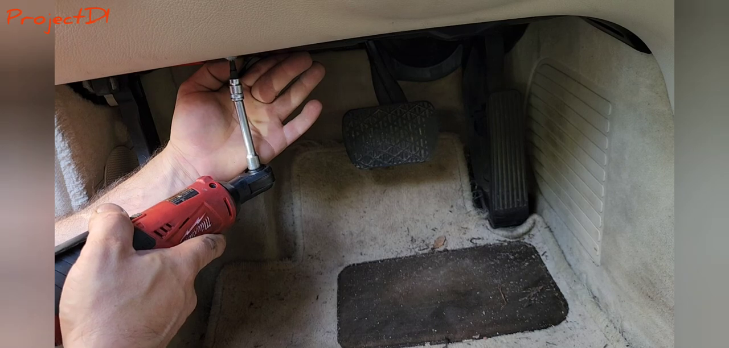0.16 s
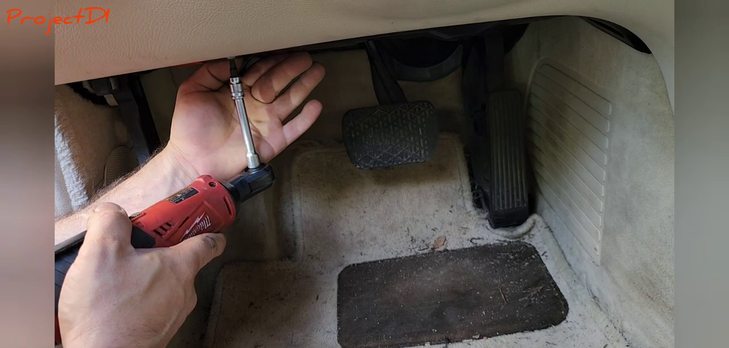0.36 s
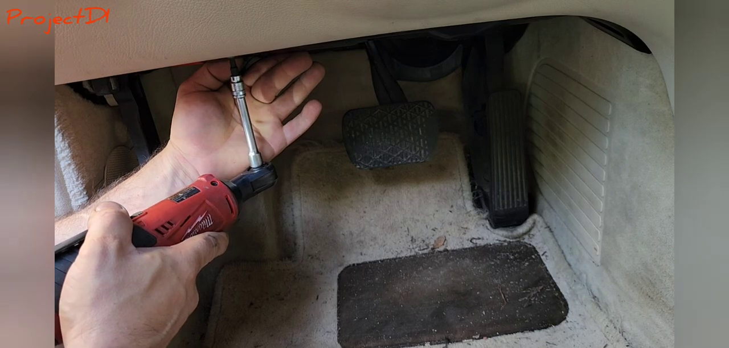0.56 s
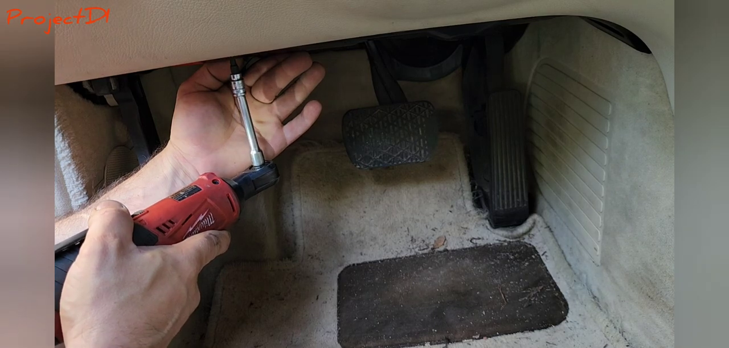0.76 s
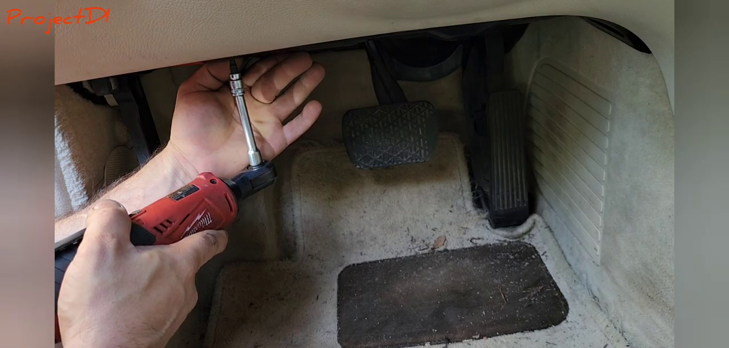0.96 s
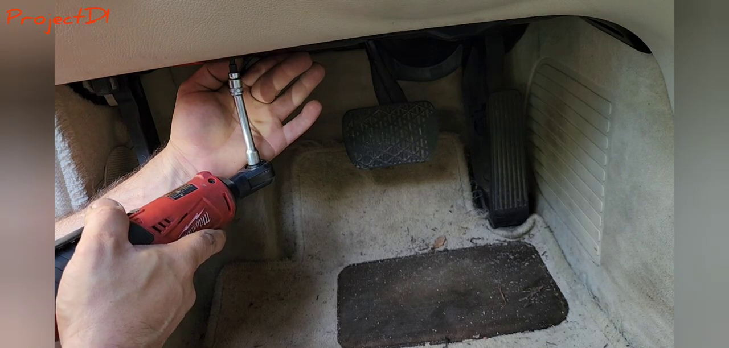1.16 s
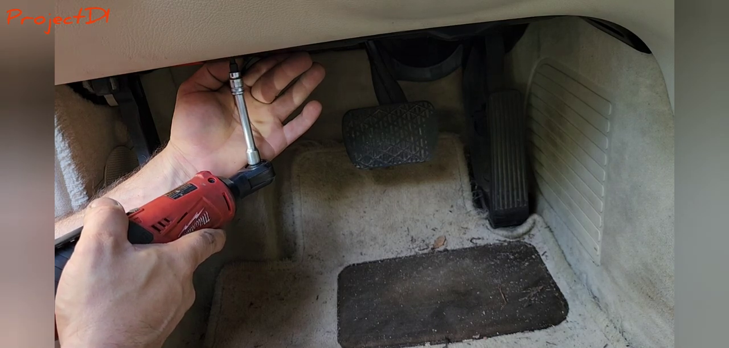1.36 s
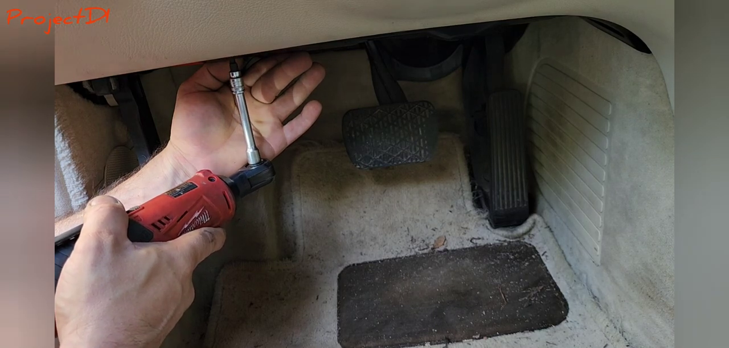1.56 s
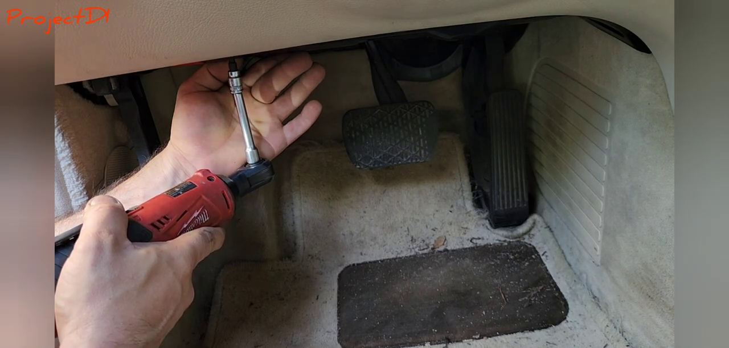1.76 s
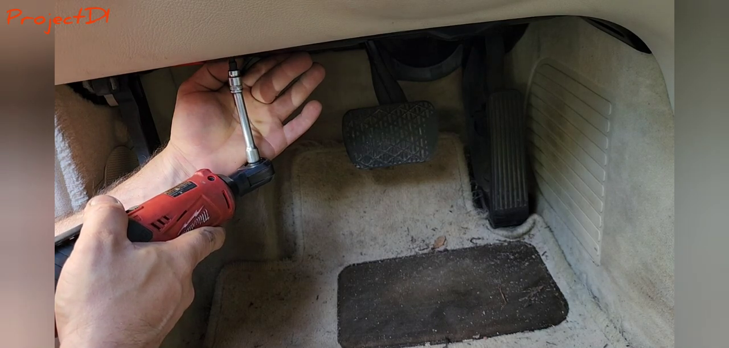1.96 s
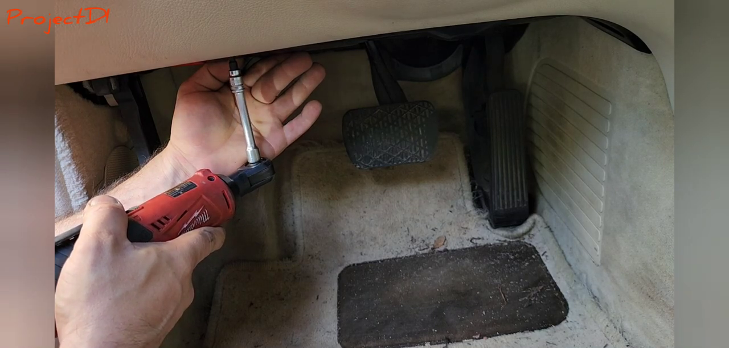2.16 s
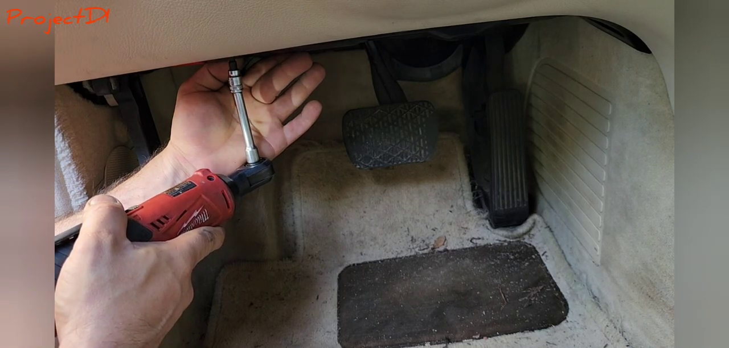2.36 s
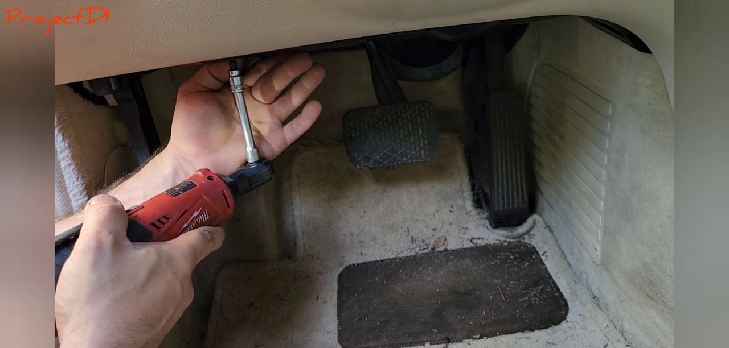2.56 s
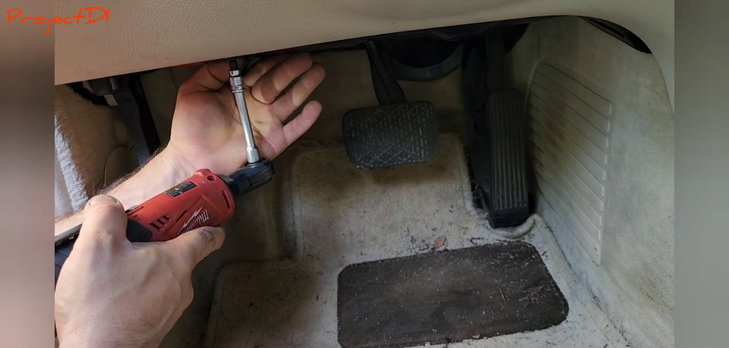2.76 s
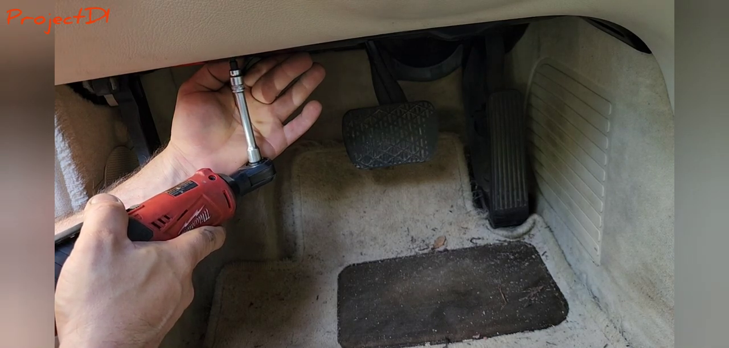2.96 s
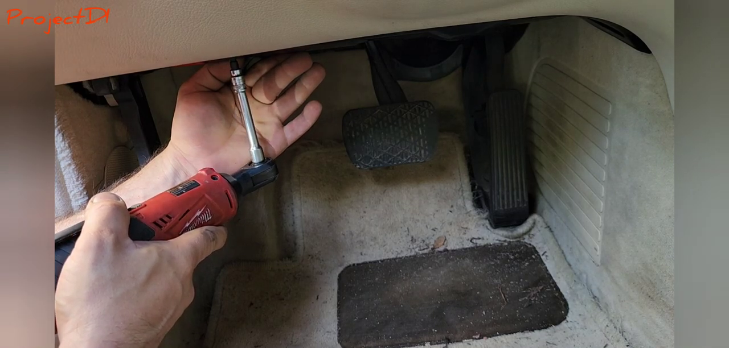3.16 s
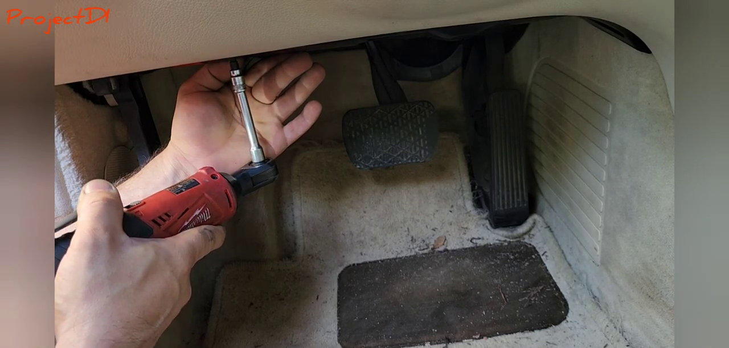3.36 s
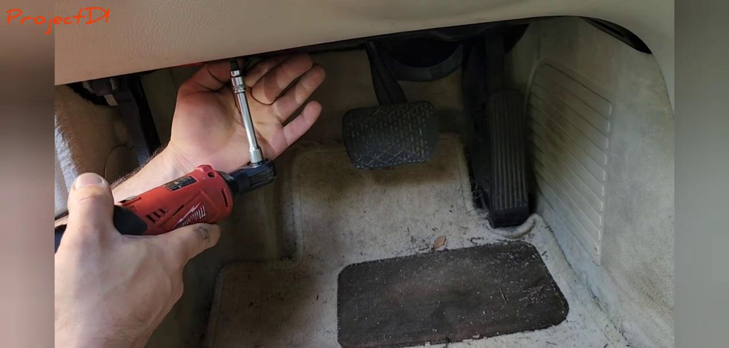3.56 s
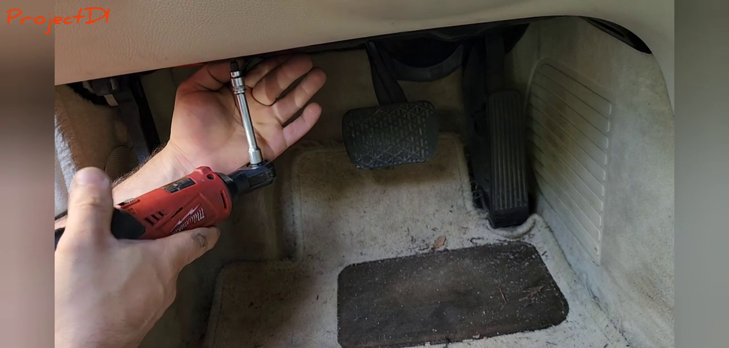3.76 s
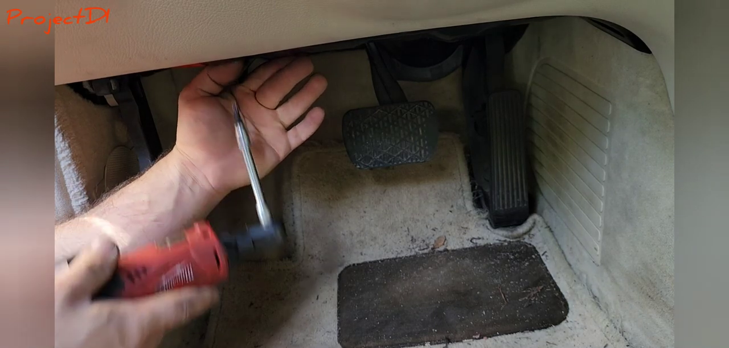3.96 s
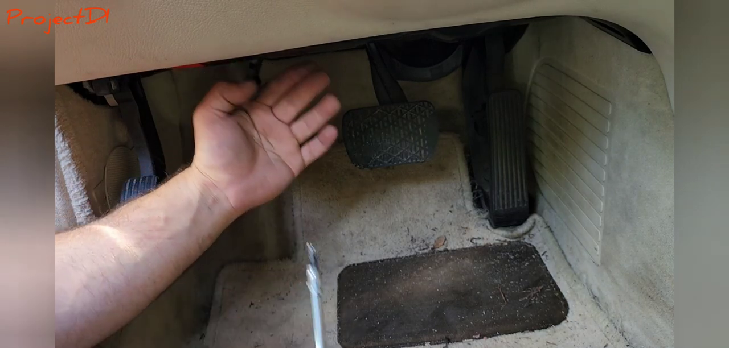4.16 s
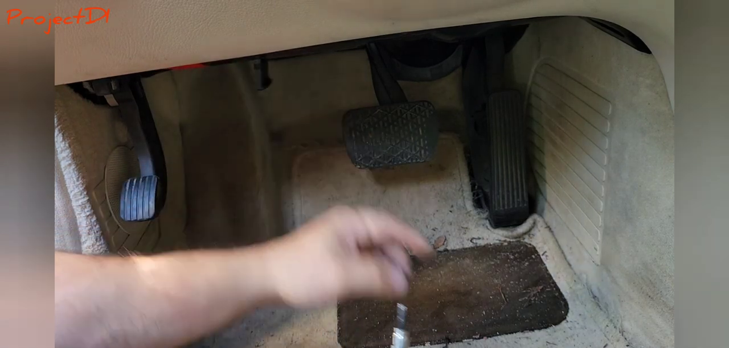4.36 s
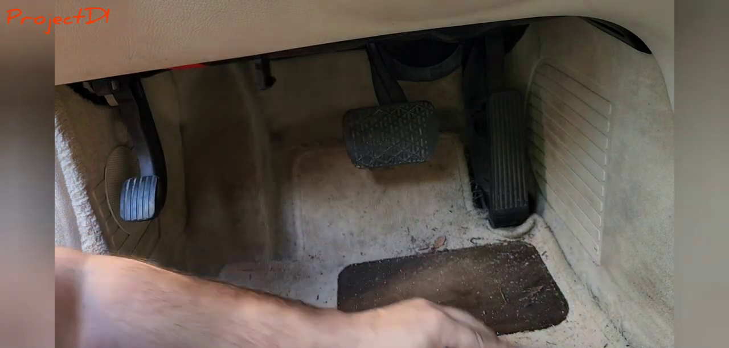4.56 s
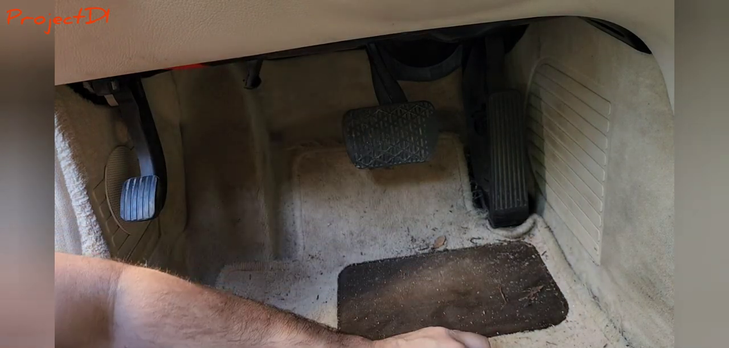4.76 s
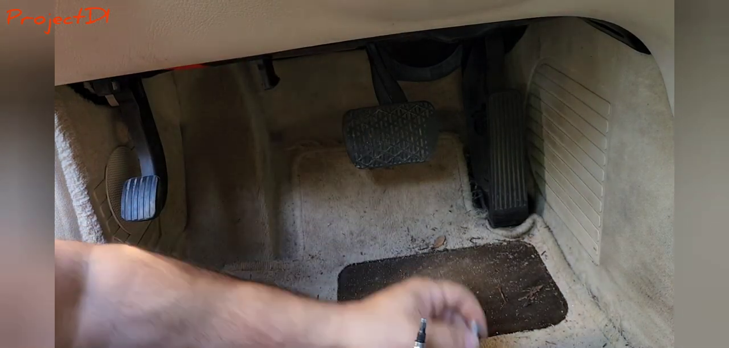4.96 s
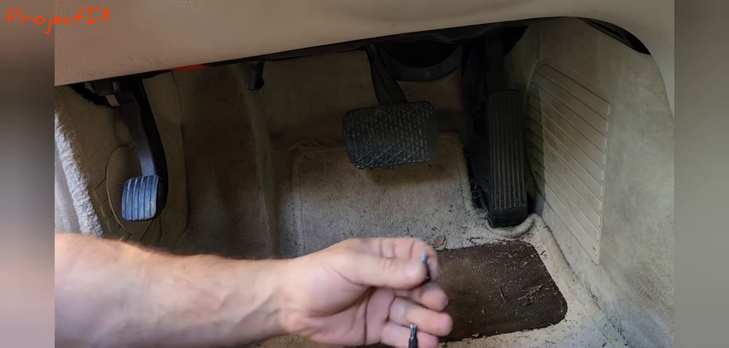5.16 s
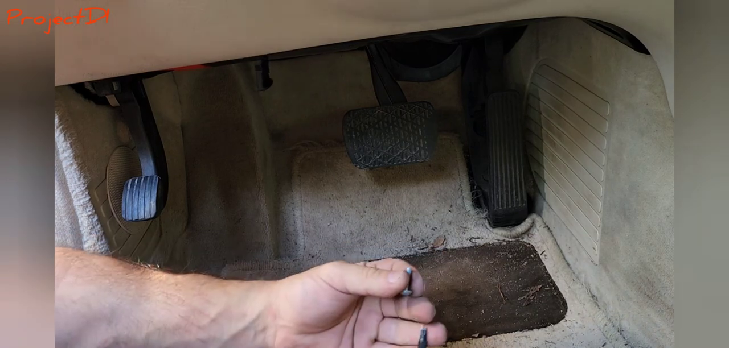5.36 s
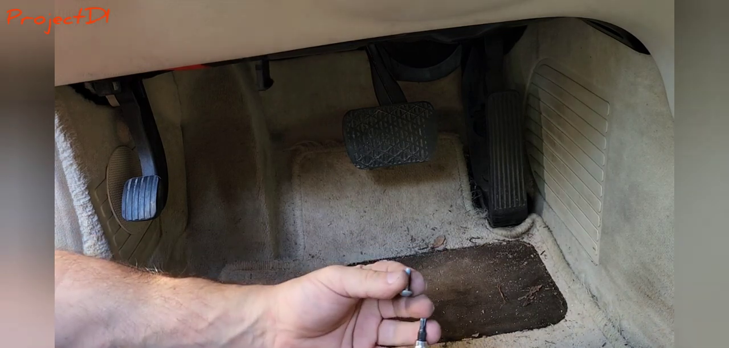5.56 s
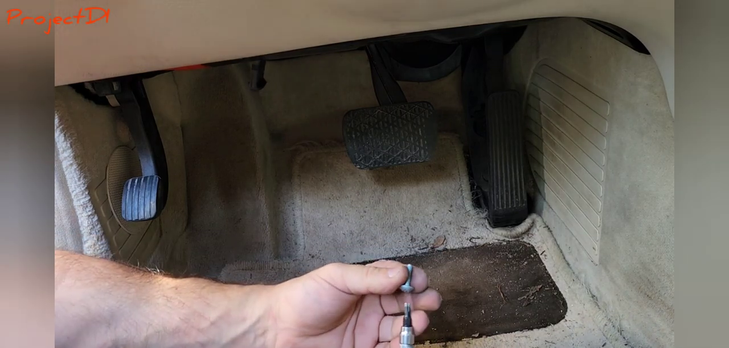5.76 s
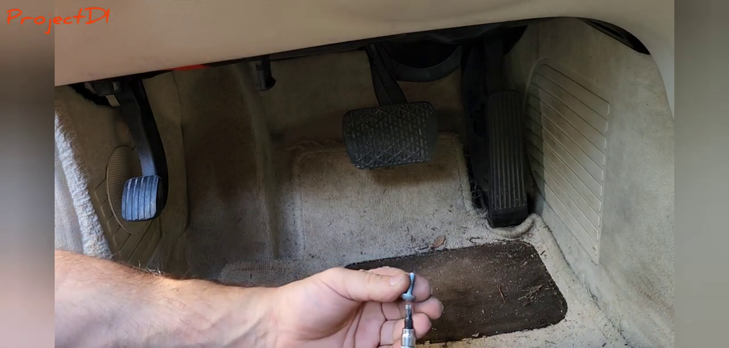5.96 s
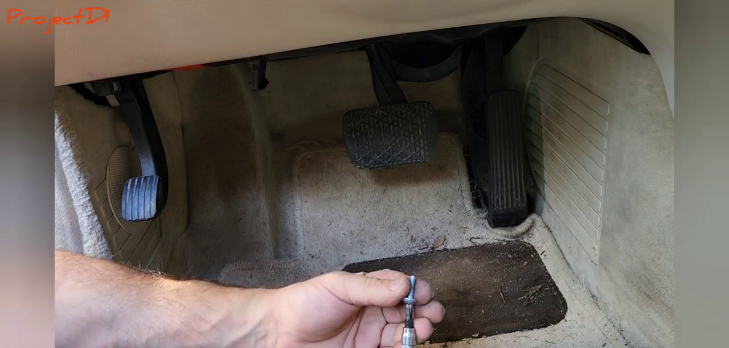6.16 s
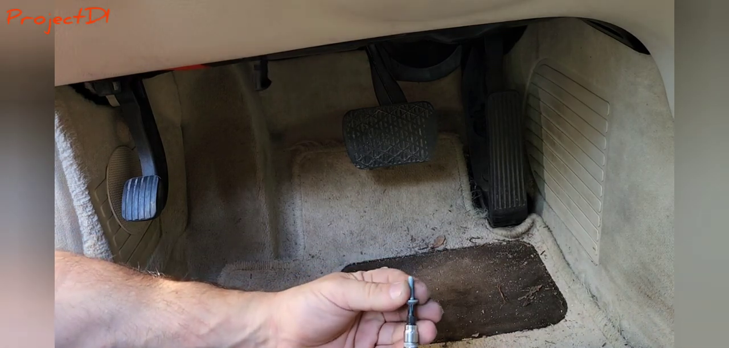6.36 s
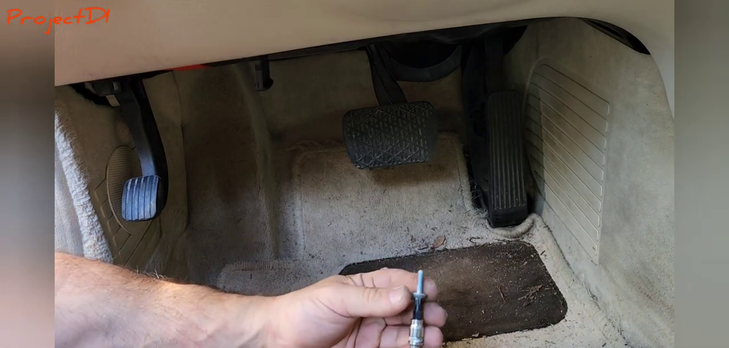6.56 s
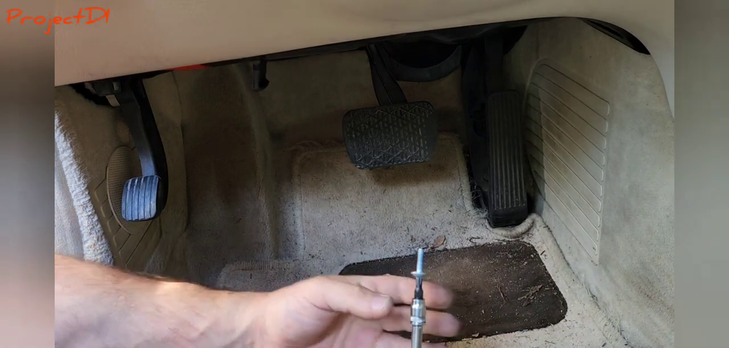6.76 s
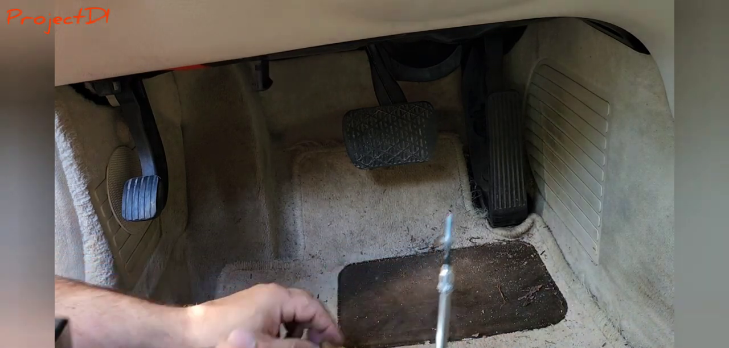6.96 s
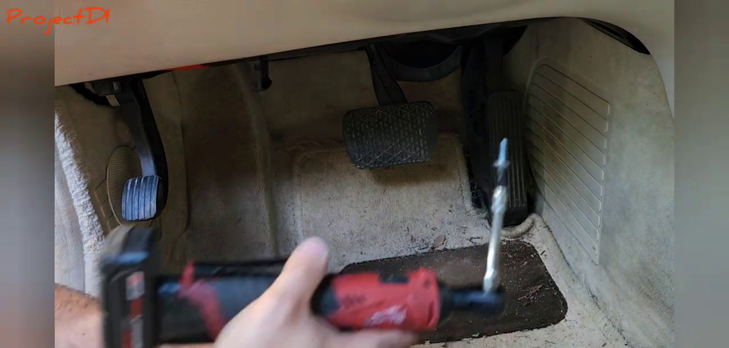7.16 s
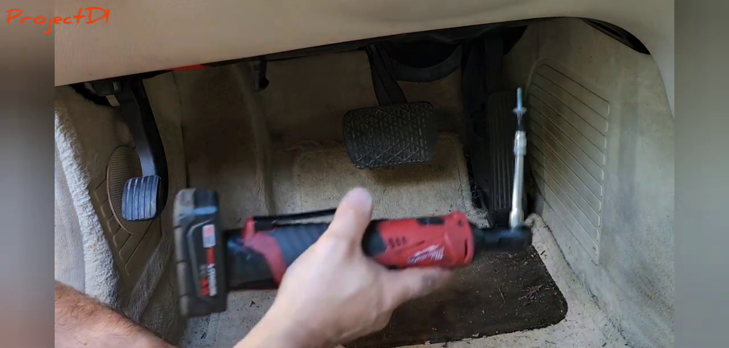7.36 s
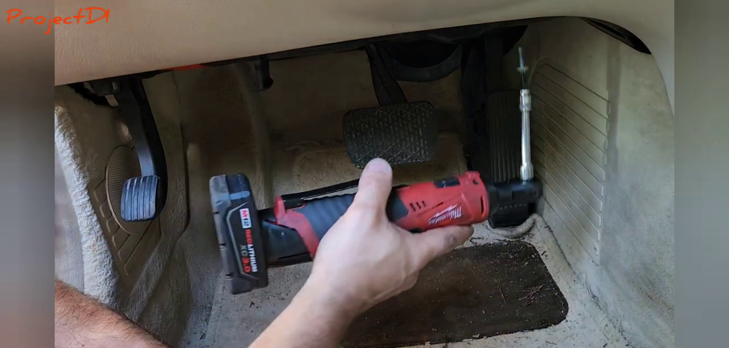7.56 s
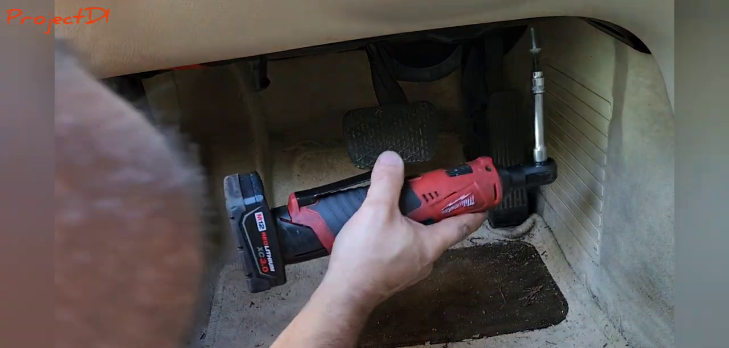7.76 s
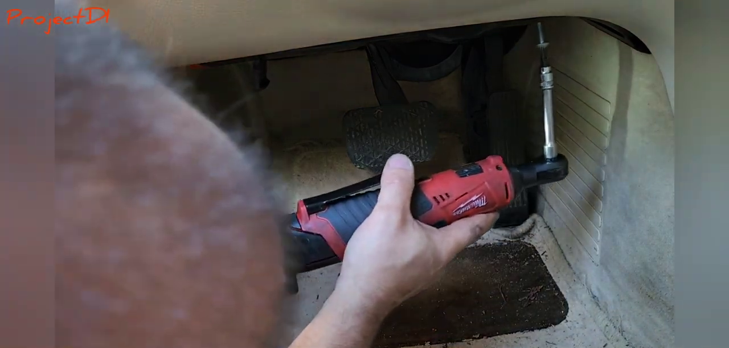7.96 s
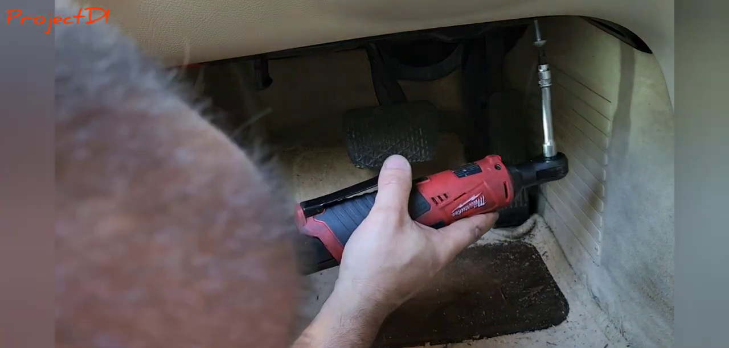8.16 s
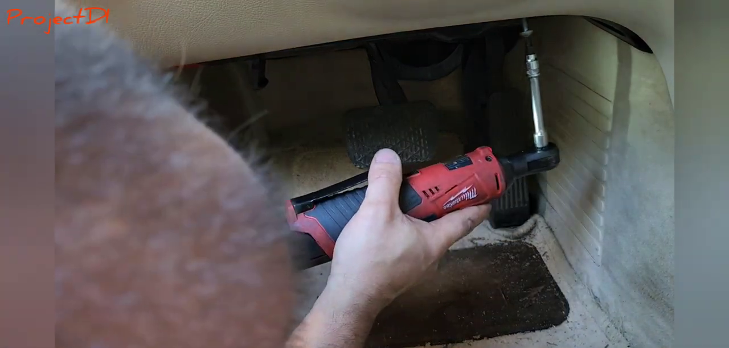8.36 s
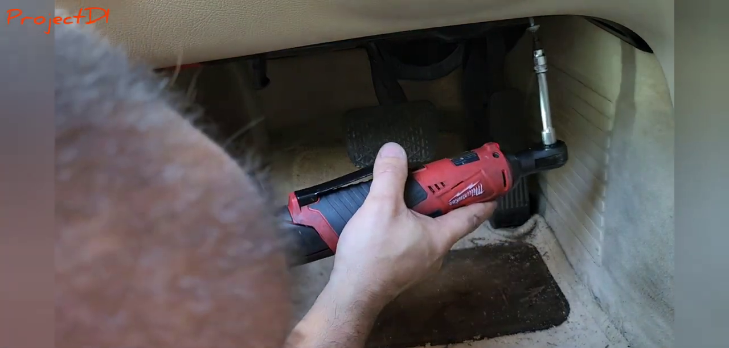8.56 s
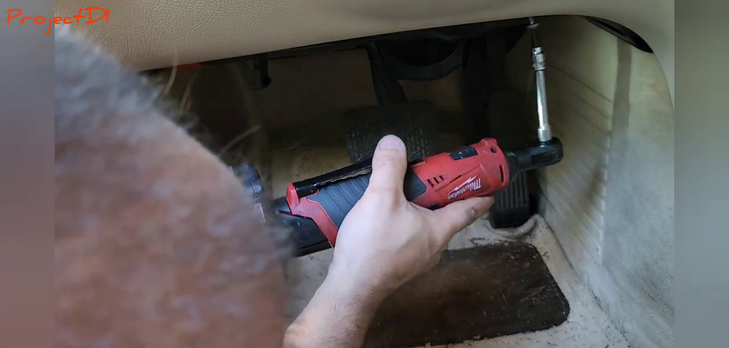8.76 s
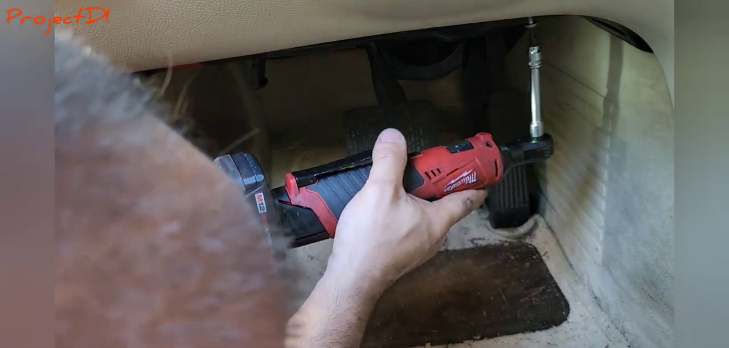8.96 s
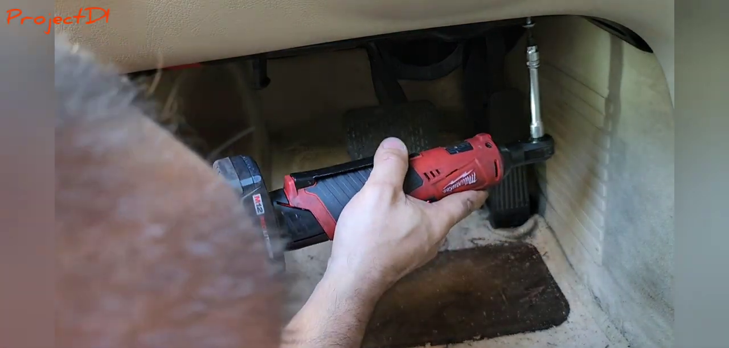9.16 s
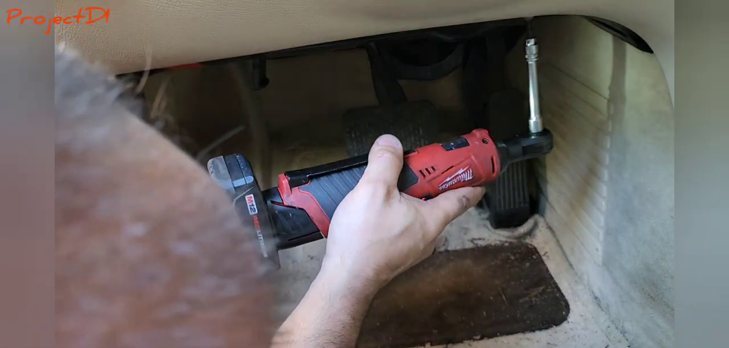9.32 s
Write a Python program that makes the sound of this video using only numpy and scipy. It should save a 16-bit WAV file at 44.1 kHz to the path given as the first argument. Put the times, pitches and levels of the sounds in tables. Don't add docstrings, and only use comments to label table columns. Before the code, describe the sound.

A cordless ratchet whirs with a fast rattling buzz, labours, hammers and stalls, then quiet clinks, knocks and cloth rustle before it briefly starts again.

```python
import sys
import numpy as np
from scipy import signal
from scipy.fft import rfft, irfft
from scipy.io import wavfile
from scipy.ndimage import uniform_filter1d

SR = 44100
rng = np.random.default_rng(int(sys.argv[2]) if len(sys.argv) > 2 else 0)


def amplitude_ratio(level_db):
    exponent = np.asarray(level_db, float) / 20
    return 10 ** exponent


def generate_wav(signal):
    frames = np.transpose(np.atleast_2d(signal))
    scaled = np.clip(frames, -1, 1) * 32767
    pcm = np.round(scaled).astype(np.int16)
    wavfile.write(sys.argv[1], SR, pcm)


N = 418509
TIME_S = np.arange(N) / SR

# t/s, rate/(turns per s)
CRANK_SPEED = [
    [(0, 84.15), (3.19, 84.1), (3.25, 77), (3.30, 69.5), (3.425, 44.5), (3.48, 28.3), (3.52, 17),
     (3.56, 14)],
    [(9.06, 20), (9.09, 30), (9.11, 54), (9.145, 66), (9.17, 80), (9.2, 85), (9.49, 85)],
]
KNOCK_AT_S = [3.549, 9.104]


def contacts(offset, spread_db, jitter):
    out = np.zeros(N)
    wobble = jitter * drift(40)
    size = amplitude_ratio(spread_db * rng.standard_normal(N))
    for rows, anchor in zip(CRANK_SPEED, KNOCK_AT_S):
        s, speed = np.transpose(rows)
        turns = np.cumsum(np.interp(TIME_S, s, speed, left=0, right=0)) / SR
        turning = (TIME_S > s[0]) * (TIME_S < s[-1])
        phase = turns - turns[round(anchor * SR)] - offset + wobble * turning
        whole_turns = np.floor(np.maximum.accumulate(phase))
        out[1:] += np.diff(whole_turns) * size[1:]
    return out


def chatter(hits, t60, steady, spread_db, alike):
    grains = spread(rng.standard_normal((3, N)), alike) * amplitude_ratio(spread_db * rng.standard_normal(N))
    speed = sum(np.interp(TIME_S, *np.transpose(rows), left=0, right=0) for rows in CRANK_SPEED)
    whirr = steady * (0.2 + 1.25 * speed / 84)
    return rms_one(grains) * (whirr + fade(hits, t60))


def softened(clicks, hz):
    rebound = clicks - .5 * np.roll(clicks, 130)
    return filtered(rebound, 1, hz)


GRIP_DB, TURNED_S = 1.1, 6


def body(x, peaks, turned, broad_db, low_hz, high_hz):
    grips = [GRIP_DB * drift(6.5) for _ in peaks]

    def resonances(table):
        return sum(amplitude_ratio(db + grip) * resonance(x, hz, width) for (hz, width, db), grip in zip(table, grips))

    out = amplitude_ratio(broad_db) * x + np.where(TIME_S < TURNED_S, resonances(peaks), resonances(turned))
    return evened(filtered(out, 2, [low_hz, min(high_hz, .45 * SR)], "band"))


# t/s, level/dB
EFFORT = [
    [(0, -0.03), (3.2, 0.3), (3.3, -2.5), (3.51, -10), (3.536, -12), (3.552, -15), (3.567, -18),
     (3.605, -50)],
    [(9.062, -53), (9.069, -30), (9.098, -20), (9.114, -8), (9.13, -3), (9.174, 1.5), (9.26, -1.5),
     (9.49, -0.1)],
]
# t/s, load/dB
LOAD = [(0, -1), (2.55, 0), (2.8, 6), (3.1, 8), (3.25, 11), (3.38, 7), (3.7, 3), (9.0, -3), (9.49, -3)]
PARTS = [
    (-23.3, 0.62, -.05, 0.24),
    (-16, 1.09, -0.04, -0.021),
    (-19, 0.94, -0.26, -.05),
]
MEAN_BITE_DB = -26.5


def part_gains():
    effort, load = in_time(EFFORT)[0], in_time([LOAD])[0]
    bite = np.clip(shaking()[0] * amplitude_ratio(-MEAN_BITE_DB), .3, 3)
    running = effort > 1e-5
    return [amplitude_ratio(db) * effort ** e * load ** l * bite ** b * running for db, e, l, b in PARTS]


# f/Hz, width/Hz, level/dB
YOKE = [(490, 60, -4), (592, 40, 2), (845, 40, -5), (1004, 50, -3.5), (1420, 190, -6), (1930, 250, 1)]
GEARS = [(3274, 430, 1), (4060, 470, -1.5), (4840, 100, -17.5), (5500, 230, -7), (6900, 110, -19.5),
         (7330, 260, 2), (8340, 370, -6.5), (9900, 610, -10.5)]
PAWL = [(12850, 180, -12.5), (12100, 220, -20), (13780, 410, -3), (14000, 490, -9), (15500, 820, 7.5)]
# f/Hz, width/Hz, level/dB
YOKE_TURNED = [(651, 90, 3), (880, 110, 0), (1000, 80, -6), (1590, 80, 1), (1850, 200, -3)]
GEARS_TURNED = [(3000, 300, 1), (3530, 350, 6.5), (4290, 220, 4), (5000, 300, -1), (5490, 220, 1),
                (7470, 250, 3), (8340, 370, -6.5)]
# f/Hz, level/dB, t60/s
PING_MODES = [(11880, -1.5, .035), (12320, -2.5, .025)]
STRAIN_HZ, STRAIN_WIDTH_HZ = 4850, 640
TURNED_YOKE_DB = -1.5


def ratchet():
    yoke_gain, gear_gain, pawl_gain = part_gains()
    load = in_time([LOAD])[0]
    knock = contacts(offset=0, spread_db=1.5, jitter=.006)
    ping = contacts(offset=-.24, spread_db=2, jitter=.025)
    back = contacts(offset=.3, spread_db=5, jitter=.06)
    blow = softened(load * knock, hz=1100)

    yoke_hits = load ** .6 * knock + .3 * back
    yoke = amplitude_ratio(19.5) * blow + chatter(yoke_hits, t60=.05, steady=.22, spread_db=2, alike=.5)
    gear_hits = load ** .4 * knock + .6 * ping + .25 * back
    gears = amplitude_ratio(9) * blow + chatter(gear_hits, t60=.04, steady=.24, spread_db=2.5, alike=.35)
    squeal = resonance(gears, STRAIN_HZ, STRAIN_WIDTH_HZ)
    gears = gears + amplitude_ratio(1.0) * np.clip(load - 1, 0, 1.1) * squeal
    pawl_hits = ping + .5 * knock + .2 * back
    pawl = chatter(pawl_hits, t60=.035, steady=.2, spread_db=2.5, alike=.35) + modal(ping, PING_MODES)

    yoke = body(yoke, YOKE, YOKE_TURNED, broad_db=-4.0, low_hz=370, high_hz=2295)
    gears = body(gears, GEARS, GEARS_TURNED, broad_db=2, low_hz=2330, high_hz=11150)
    pawl = body(pawl, PAWL, PAWL, broad_db=3.5, low_hz=10800, high_hz=18120)
    yoke = yoke_gain * yoke * amplitude_ratio(0.9 * drift(5.5) + TURNED_YOKE_DB * (TIME_S > TURNED_S))
    gears = gear_gain * gears * amplitude_ratio(0.48 * drift(14))
    pawl = pawl_gain * pawl * amplitude_ratio(1.5 * drift(6.9))
    return panned(yoke, pan_db=2.2) + panned(gears, pan_db=0.14) + panned(pawl, pan_db=-2.6)


# t/s, hold/s, drumming/dB, buzz/dB
BITES = [(0, 0.33, -30, -40), (.55, 0.099, -21.5, -38), (.785, 0.027, -15, -32), (1.29, 0.057, -14, -30.5),
         (1.6, 0.0072, -15.5, -31), (1.86, 0.0091, -24, -30.5), (2.09, 0.11, -16, -31),
         (2.25, 0.021, -17.5, -30.5), (2.6, 0.033, -21, -31), (2.71, 0.048, -15, -26),
         (2.84, 0.019, -13, -26.5), (2.92, 0.056, -18, -28), (3.07, 0.23, -16, -25),
         (3.3, 0.17, -17.5, -27.5), (3.555, 0.05, -23.5, -45.5), (9.14, 0.31, -57, -40.5),
         (9.245, 0.03, -31.5, -24.5), (9.33, .04, -36, -31), (9.45, .04, -28.5, -29)]
BITE_RISE_DB_PER_S, BITE_FALL_DB_PER_S = 109.5, 111
REST_DRUM_DB, REST_BUZZ_DB = -28.5, -33.5
STILL_FROM_S, STILL_TO_S, STILL_DB_PER_S = 3.62, 9.14, 500


def shaking():
    idle_s = np.clip(np.minimum(TIME_S - STILL_FROM_S, STILL_TO_S - TIME_S), 0, None)
    coasting_s = CRANK_SPEED[0][-3][0]
    rows = BITES + [(0, coasting_s, REST_DRUM_DB, REST_BUZZ_DB)]
    return strokes(rows, BITE_RISE_DB_PER_S, BITE_FALL_DB_PER_S) * amplitude_ratio(-STILL_DB_PER_S * idle_s)


# f/Hz, level/dB, t60/s
DRUM_MODES = [(95, -1, 0.065), (101.9, 0.5, 0.022)]
BUZZ_MODES = [(135, -10, .03), (168, 3, .04), (205, 0, .035)]
# f/Hz, level/dB, t60/s
BRACE_MODES = [(250, -4, .05), (335, 2, .055), (420, -18, .03)]
BRACE_DB, BRACE_FOLLOWS = -7.5, 1.0
# f/Hz, level/dB, t60/s
HAMMER_MODES = [(315.6, -3, 0.035), (510, -3.5, 0.039), (645, 1.5, 0.039), (830, -1.5, .03),
                (1000, -1.5, 0.035), (1282, 1, .025), (1510, 0, 0.036)]
# t/s, hold/s, level/dB
JAMS = [
    (1.27, .09, -29.5),
    (2.08, .18, -30.5),
    (2.7, .33, -37),
    (3.04, .17, -26.5),
    (3.21, .14, -19.5),
    (3.36, .12, -27),
    (9.234, .035, -21.5),
    (9.445, .045, -24.5),
]
JAM_RISE_DB_PER_S, JAM_FALL_DB_PER_S = 420, 220
HAMMER_ROUGH_DB, SWAY_DB = -30, -46


def panel():
    drum_gain, buzz_gain = shaking()
    load = in_time([LOAD])[0]
    knock = contacts(offset=.05, spread_db=1, jitter=.004) * load
    shake = spread(rng.standard_normal((3, N)), alike=0.97)

    drum = modal(knock + amplitude_ratio(-36.0) * shake, DRUM_MODES)
    drum = filtered(drum, 3, [62, 122], "band")
    buzz = modal(knock + amplitude_ratio(-22) * shake, BUZZ_MODES)
    buzz = filtered(buzz, 2, 130, "high")
    brace = modal(knock + amplitude_ratio(-30.0) * shake, BRACE_MODES)
    brace = filtered(brace, 2, 210, "high")
    buzz = evened(buzz) + amplitude_ratio(BRACE_DB) * load ** BRACE_FOLLOWS * evened(brace)
    sway = rms_one(filtered(shake, 2, [20, 60], "band"))

    blows = amplitude_ratio(HAMMER_ROUGH_DB) * shake - np.roll(knock, 30)
    hammer = 0
    for k, (hz, db, t60) in enumerate(HAMMER_MODES):
        hammer = hammer + (-1) ** k * amplitude_ratio(db) * ring(blows, hz, t60)
    hammer = evened(filtered(hammer, 2, 260, "high"))
    hammer = strokes(JAMS, JAM_RISE_DB_PER_S, JAM_FALL_DB_PER_S) * hammer
    sway = amplitude_ratio(SWAY_DB) * in_time(EFFORT) ** .4 * sway
    return sway - drum_gain * evened(drum) - buzz_gain * buzz + hammer


# t/s, level/dB
CHOP = [(9.054, -100), (9.058, -58), (9.07, -53), (9.095, -59), (9.11, -68), (9.12, -100)]
CHOP_HZ = 1830
CHOP_OVERTONES_DB = [0, -9, -1, 0, -8, -14, -13]


def controller():
    phase = 2 * np.pi * CHOP_HZ * TIME_S
    whine = sum(amplitude_ratio(db) * np.sin((k + 1) * phase) for k, db in enumerate(CHOP_OVERTONES_DB))
    return in_time([CHOP])[0] * np.sqrt(2) * whine


# t/s, peak/dB, ring share, t60/s, pan/dB
CLINKS = [(3.5896, -43, 0.1, 0.025, 3), (3.6435, -52, 0.1, 0.03, 0.0), (3.7771, -24.5, 0.9, 0.069, 2),
          (3.824, -39, 0.08, 0.035, 1), (3.8571, -41, 0.1, 0.04, 3), (3.8764, -45, 0.1, 0.035, -3),
          (3.9, -47, 0.1, 0.031, 3.0), (4.2563, -19, 0.037, 0.028, 0.5), (4.815, -28.5, 0.17, 0.028, 2),
          (4.8858, -54, 0.1, 0.035, 5.5), (5.8804, -57, 0.3, 0.027, 8), (6.037, -39, 0.1, 0.035, 2),
          (6.235, -48, 0.1, 0.046, 0.5), (6.2493, -36, 0.3, 0.041, 1), (6.339, -40, 0.15, 0.038, 1),
          (6.5744, -56, 0.3, 0.032, 4.5), (7.1644, -48, 0.093, 0.035, 11), (7.879, -39.5, 0.087, 0.1, 2.5),
          (8.0621, -51, 0.088, 0.035, 9), (8.982, -35.5, 0.081, 0.019, 0)]
# f/Hz, level/dB, t60/s
STEEL = [(1870, -12, .05), (2210, -11, .05), (3150, -1, .035), (4200, 1, .04), (7009, -10, .04),
         (11460, -7, .045), (12400, -12, .04)]
# f/Hz, level/dB, t60/s
BAR = [(3612, -2, .17), (5663, -5, .1), (7009, -3, .07), (9049, -9, .14), (11510, 5, .065)]
FREED_S, FREED_DB = 3.7766, -36.5


def clinks():
    rows = np.array(CLINKS)
    share = np.clip(rows[:, 2], .01, 1)
    out = struck(rows, rows[:, 1] + 20 * np.log10(share) - 1.5, rows[:, 4], STEEL, spread_db=2.2)
    freed = 1. * (np.arange(N) == round(FREED_S * SR))
    out += amplitude_ratio(FREED_DB) * modal(freed, BAR)
    hiss = filtered(spread(rng.standard_normal((3, N)), alike=0.1), 1, [1500, 6000], "band")
    t = np.arange(5000) / SR
    for s, db, _, t60, pan_db in rows:
        i = round(s * SR)
        decay = amplitude_ratio(db + 0.5 - 60 * t / max(t60, .004))
        out[:, i:i + len(t)] += panned(hiss[:, i:i + len(t)] * decay, pan_db)
    return out


# t/s, socket/dB, floor pan/dB
SET_DOWN = [
    (4.2565, -29, -19.5),
    (4.8155, -35, -60),
]
# f/Hz, level/dB, t60/s
SOCKET = [(1700, -9, .03), (2930, 0, .022), (3250, 0, .03), (11590, -14, .05)]
FLOOR_PAN = [(47, -4, .12), (126, 0, .07)]


def set_down():
    rows = np.array(SET_DOWN)
    return modal(clicks_at(rows[:, 0], rows[:, 1]), SOCKET) + modal(clicks_at(rows[:, 0], rows[:, 2]), FLOOR_PAN)


# t/s, peak/dB, thump/dB, pan/dB, hardness/(dB per octave)
KNOCKS = [(3.776, -40, -45.5, 6, 2), (3.946, -41.5, -38, 2.0, -1), (3.963, -52, -43, -1, -3),
          (4.256, -24, -29, 3.5, -1), (4.816, -48, -65, 15, 5), (5.133, -52, -63, 4, 10),
          (5.881, -52, -60, 3, -3), (7.171, -46, -39, 2.0, 4), (7.664, -45, -51, 3.5, -3),
          (7.899, -49, -49, 15, 7), (8.356, -24.5, -36, -3, 1), (8.446, -40, -42, -3, -2),
          (8.467, -36, -35, -2, -3), (8.489, -35, -34, -2, -3), (8.511, -36, -34, -2, -3),
          (8.559, -51, -43, 7, -7), (8.613, -48, -47, 4, 16), (8.659, -39, -41, 3, 7),
          (8.952, -46, -49, 3.5, 8), (8.998, -43.5, -53, 4, 14)]
# f/Hz, level/dB, t60/s
TRIM = [(290, -21.5, 0.28), (492, 6, 0.04), (672, 11.5, 0.028), (870, 9, 0.04), (1370, 4.5, 0.013),
        (1814, -12, 0.035), (2080, -41, .02), (2860, -33, .015), (3420, -22, .015)]
THUMP = [(90.4, 9.5, 0.16), (160.3, 4, 0.11), (222, 3, 0.062)]


def knocks():
    rows = np.array(KNOCKS)
    trim = struck(rows, rows[:, 1] - 8, rows[:, 3], TRIM, spread_db=2.5, tilt_db=rows[:, 4])
    hits = clicks_at(rows[:, 0], rows[:, 1] - 8.0)
    puff = fade(hits, t60=0.063) * spread(rng.standard_normal((3, N)), alike=0.22)
    puff = filtered(puff, 2, [350, 2200], "band")
    thump = struck(rows, rows[:, 2], 0 * rows[:, 3], THUMP, spread_db=1.5)
    return filtered(trim + puff + thump, 3, 3800)


# t/s, hold/s, level/dB, airiness/dB
BRUSHES = [(3.618, .01, -75, -12), (3.76, 0.16, -66, 0.1), (3.95, 0.25, -65.5, 5), (4.336, .1, -62.5, -6),
           (4.462, .03, -63.5, 3.5), (4.54, 0.073, -64, -20), (4.653, 0.1, -62.5, -6.5),
           (4.797, .06, -65.5, -14), (5.002, 0.048, -63, -4.5), (5.135, 0.063, -61.5, -1),
           (5.2, 0.2, -72, 4), (5.86, 0.12, -73, -10), (6.19, .01, -74, -18), (6.571, 0.0086, -70, -13),
           (6.705, .08, -62.5, 5), (6.8, 0.2, -59, 6), (6.955, 0.36, -63, 6), (7.349, 0.22, -62, 3.5),
           (7.578, 0.083, -61, -8), (7.758, 0.15, -64, -5), (8.055, 0.0079, -68.5, -15),
           (8.49, .02, -83, -5), (8.66, .02, -82, -20), (8.83, 0.092, -72.5, -13), (8.965, 0.023, -66, -15)]
BRUSH_RISE_DB_PER_S, BRUSH_FALL_DB_PER_S = 298, 250
# f/Hz, density/(dB per Hz)
RUSTLE_DULL = [(240, -42.5), (400, -14), (652, -3.5), (833, -3.5), (922, -3.5), (1890, -12.5),
               (3000, -32.5), (3900, -34), (6600, -120)]
RUSTLE_BRIGHT = [(1290, -35), (2200, -2.5), (3250, -1.5), (3680, 0), (5210, -10.5), (7500, -10.5),
                 (9750, -19), (16500, -120)]
RUSTLE_AIRY = [(3820, -14), (6500, -7.5), (10000, -11.5), (15100, -16), (16000, -5)]
CLOTH_REST_DB, CLOTH_DULL_DB = -60.5, 1


def rustle():
    rows = [(s, hold, db, db + air_db) for s, hold, db, air_db in BRUSHES]
    bright, airy = strokes(rows, BRUSH_RISE_DB_PER_S, BRUSH_FALL_DB_PER_S)
    dull = np.hypot(amplitude_ratio(CLOTH_REST_DB), amplitude_ratio(CLOTH_DULL_DB) * bright)
    patches = amplitude_ratio(1.0 * drift(25))
    layers = [(dull, RUSTLE_DULL, .6), (bright, RUSTLE_BRIGHT, .35), (airy, RUSTLE_AIRY, .25)]
    out = 0
    for gain, colour, alike in layers:
        out = out + gain * spread(coloured(colour, (3, N)), alike) * amplitude_ratio(1.1 * drift(14))
    return patches * out


# t/s, level/dB
CREAKS = [
    (7.3567, -54),
    (7.4086, -52),
    (7.4939, -52),
    (7.5457, -49),
    (7.5926, -48),
    (7.6294, -52),
    (7.665, -48),
]
# f/Hz, level/dB, t60/s
SEAT = [(1950, -9, .05), (2120, -5, .06), (2300, -11, .04)]


def seat():
    return modal(clicks_at(*np.transpose(CREAKS)), SEAT)


# f/Hz, density/(dB per Hz)
RUMBLE = [(8.8, -52), (15, -14.5), (43, -1.5), (91, -3), (119, -12.5), (191, -10), (207, -10.5),
          (220, -27.5), (245, -21), (427, -28), (600, -30), (780, -61.5), (1320, -120)]
RUMBLE_DB = -45


def rumble():
    mid, side = coloured(RUMBLE, (2, N))
    swell = amplitude_ratio(RUMBLE_DB + 1.5 * drift(1.7))
    return swell * (mid + amplitude_ratio(-12.0) * side * [[1], [-1]])


# f/Hz, density/(dB per Hz)
SELF_NOISE = [(1500, -31.5), (2500, 6), (5000, -4), (7300, -9), (7600, -2.5), (7900, -1.5), (9000, -23)]
SELF_NOISE_DB = -77.5


def self_noise():
    return amplitude_ratio(SELF_NOISE_DB) * coloured(SELF_NOISE, (2, N))


def footwell(x, lead_s, wet_db, t60):
    t = np.arange(4000) / SR
    echoes = rng.standard_normal((2, len(t))) * amplitude_ratio(-60 * t / t60) * (t > .002)
    echoes = filtered(echoes, 2, 250, "high")
    echoes *= amplitude_ratio(wet_db) / np.linalg.norm(echoes, axis=1, keepdims=True)
    late = np.interp(np.arange(N) - np.round(lead_s * SR), np.arange(N), x[1])
    return np.array([x[0], late]) + signal.fftconvolve(x, echoes, axes=1)[:, :N]


def struck(rows, level_db, pan_db, modes, spread_db, tilt_db=0):
    at, out = np.round(rows[:, 0] * SR).astype(int), np.zeros((2, N))
    chance = rng.standard_normal((len(at), len(modes), 3))
    sides_db = np.outer([.5, -.5], pan_db)
    for k, (hz, db, t60) in enumerate(modes):
        clicks = np.zeros((2, N))
        late = np.abs(chance[:, k, 1] * SR / hz / 2).astype(int)
        size_db = level_db + db + spread_db * chance[:, k, 0] + tilt_db * np.log2(hz / 1000)
        clicks[:, at + late] = amplitude_ratio(size_db + sides_db) * np.sign(chance[:, k, 2])
        out += ring(clicks, hz, t60)
    return out


def clicks_at(s, level_db):
    clicks = np.zeros(N)
    clicks[np.round(s * SR).astype(int)] = amplitude_ratio(level_db)
    return clicks


def modal(clicks, modes):
    return sum(amplitude_ratio(db) * ring(clicks, hz, t60) for hz, db, t60 in modes)


def ring(clicks, hz, t60):
    r, w = amplitude_ratio(-60 / (t60 * SR)), 2 * np.pi * hz / SR
    return signal.lfilter([0, np.sin(w)], [1, -2 * r * np.cos(w), r * r], clicks + 1e-18)


def fade(clicks, t60):
    return signal.lfilter([1], [1, -amplitude_ratio(-60 / (max(t60, .001) * SR))], clicks + 1e-18)


def resonance(x, hz, width):
    r = np.exp(-np.pi * width / SR)
    top = (1 - r * r) / 2 * np.array([1, 0, -1])
    return signal.lfilter(top, [1, -2 * r * np.cos(2 * np.pi * hz / SR), r * r], x)


def filtered(x, order, hz, kind="low"):
    return signal.sosfilt(signal.butter(order, hz, kind, fs=SR, output="sos"), x)


def coloured(spectrum, shape):
    hz, level_db = np.transpose(spectrum)
    f = np.maximum(np.fft.rfftfreq(N, 1 / SR), 1)
    gain = amplitude_ratio(np.interp(np.log(f), np.log(hz), level_db))
    return rms_one(irfft(rfft(rng.standard_normal(shape)) * gain, N))


def strokes(rows, rise_db_per_s, fall_db_per_s):
    t, power = np.arange(0, N + 64, 64) / SR, 0
    for s, hold, *level_db in rows:
        loss_db = rise_db_per_s * np.clip(s - t, 0, None) + fall_db_per_s * np.clip(t - s - hold, 0, None)
        power = power + amplitude_ratio(np.subtract.outer(level_db, loss_db)) ** 2
    return np.array([np.interp(TIME_S, t, np.sqrt(p)) for p in power])


def in_time(tables):
    out = 0
    for rows in tables:
        s, *columns = np.transpose(rows)
        out = out + np.array([amplitude_ratio(np.interp(TIME_S, s, c, left=-150, right=-150)) for c in columns])
    return uniform_filter1d(out, size=120, mode="nearest")


def drift(rate):
    r = np.exp(-80 * np.pi * rate / SR)
    slow = signal.lfilter([1], [1, -2 * r, r * r], rng.standard_normal(N // 40 + 2002))[2000:]
    return np.interp(np.arange(N) / 40, np.arange(len(slow)), rms_one(slow))


def evened(x):
    power = np.mean(np.atleast_2d(x) ** 2, axis=0)
    power = uniform_filter1d(uniform_filter1d(power, size=2600), size=2600)
    return x / np.sqrt(np.abs(power) + 1e-12)


def rms_one(x):
    return x / np.sqrt(np.mean(x ** 2) + 1e-20)


def spread(draws, alike):
    alike = np.clip(alike, 0, 1)
    return np.sqrt(alike) * draws[0] + np.sqrt(1 - alike) * draws[1:]


def panned(x, pan_db):
    return x * amplitude_ratio(np.array([[.5], [-.5]]) * pan_db)


def scene():
    tool = footwell(ratchet() + panel(), lead_s=.00015, wet_db=-13, t60=.05)
    steel = footwell(clinks() + set_down(), lead_s=.00002, wet_db=-11, t60=.05)
    hands = footwell(knocks() + rustle() + seat(), lead_s=.00045, wet_db=-11, t60=.05)
    return tool + controller() + steel + hands + rumble() + self_noise()


def band_limit(x):
    return signal.sosfilt(signal.butter(12, 16840, fs=SR, output="sos"), x)


def record(dry):
    cut = signal.sosfilt(signal.cheby2(12, 60, 15800 + 650, fs=SR, output="sos"), dry)
    return band_limit(np.clip(cut, -1, 1))


dry = scene()
out = record(dry)
generate_wav(out)
```